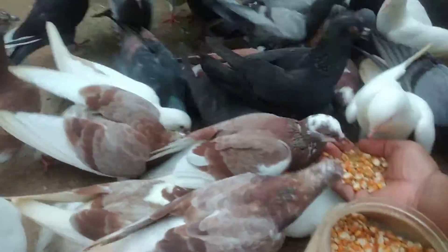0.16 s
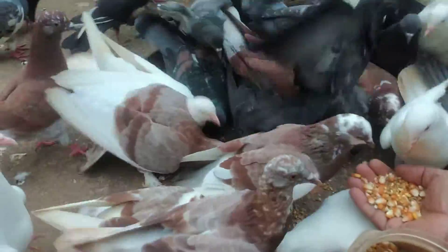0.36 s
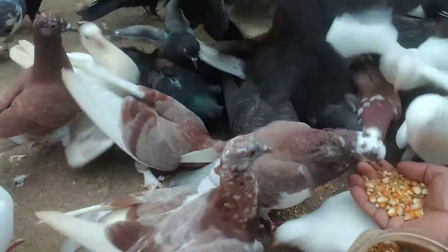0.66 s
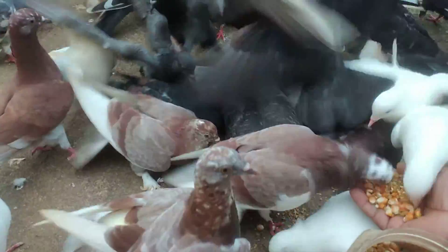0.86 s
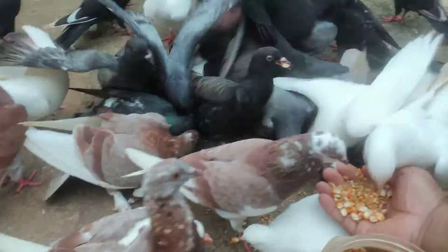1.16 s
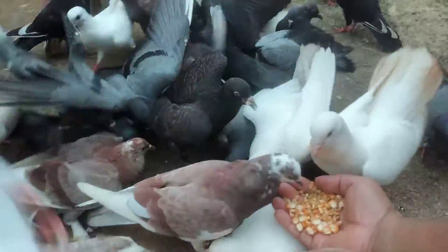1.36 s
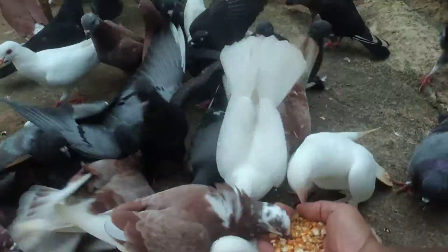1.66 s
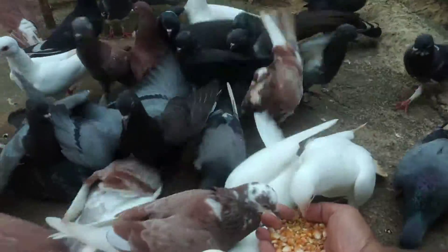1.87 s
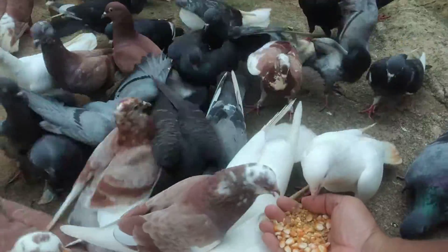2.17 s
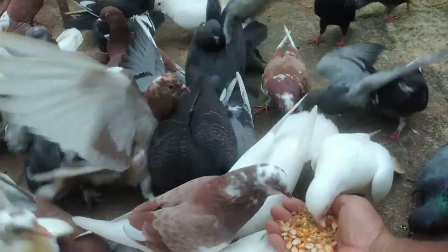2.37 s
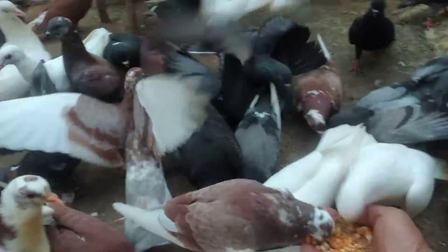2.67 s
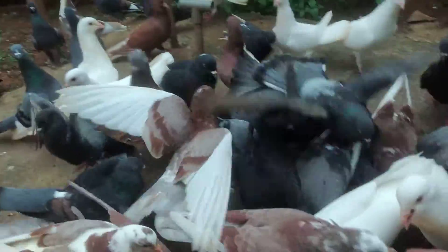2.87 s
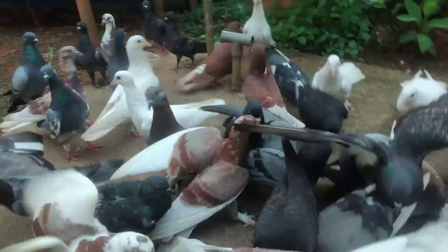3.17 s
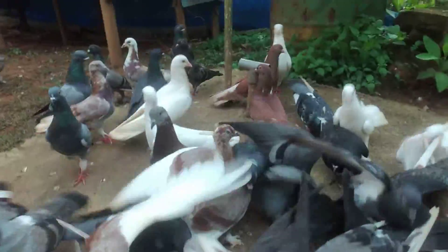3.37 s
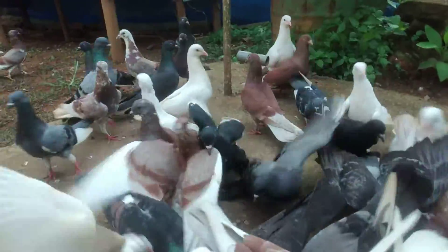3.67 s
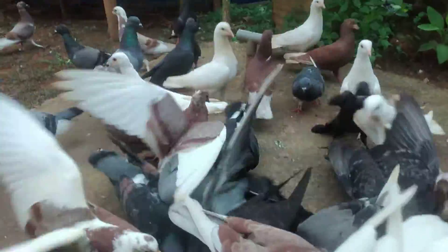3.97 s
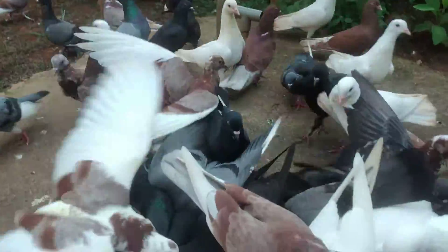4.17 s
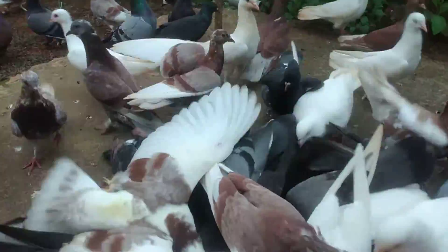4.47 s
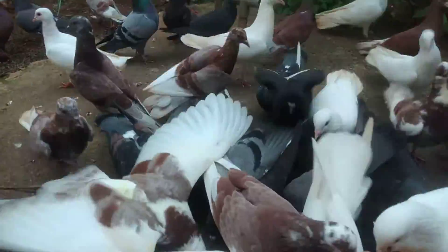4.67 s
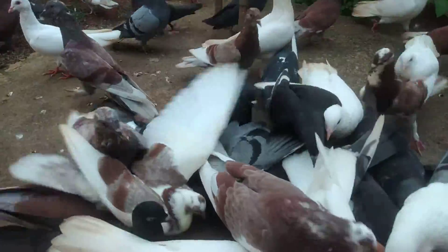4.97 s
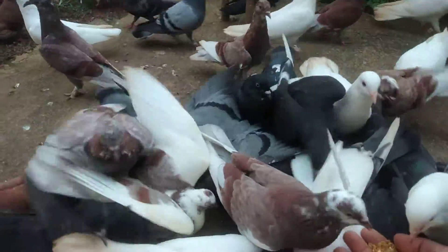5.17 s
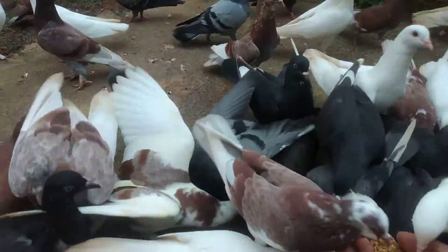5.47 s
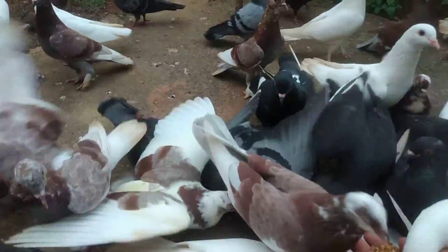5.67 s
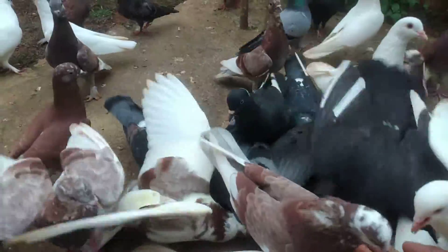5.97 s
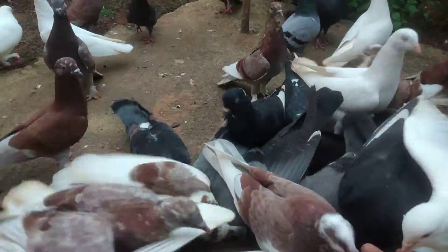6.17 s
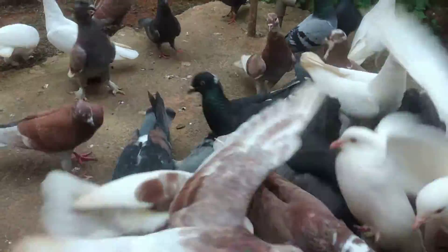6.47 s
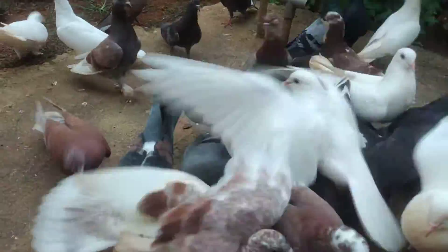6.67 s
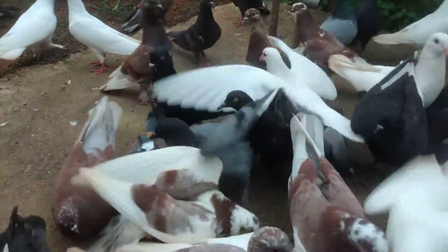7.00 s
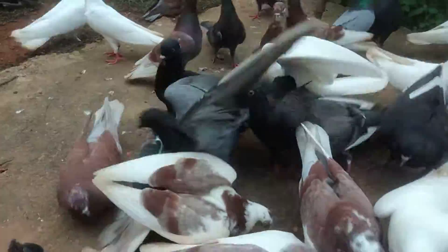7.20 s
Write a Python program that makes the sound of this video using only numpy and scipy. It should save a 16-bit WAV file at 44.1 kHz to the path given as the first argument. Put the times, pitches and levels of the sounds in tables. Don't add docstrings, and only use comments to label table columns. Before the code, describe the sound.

Pigeons scramble for grain around a handheld phone outdoors. Dry, papery wing beats and sharp quill clicks stand out over continuous feather rustle and distant murmuring. Two short bubbling coos drop in pitch, and small raspy chirps stay faint. A deep air thump hits early on; later come light beak ticks, dull handling pops and a final dense clatter of wings. The left is open and bright, the right dull and windy.

```python
import sys
import numpy as np
from scipy import signal
from scipy.io import wavfile

SR = 44100
rng = np.random.default_rng(int(sys.argv[2]) if len(sys.argv) > 2 else 0)


def elevation(decibels):
    levels = np.asarray(decibels, float)
    return 10 ** (levels / 20)


def dump_mix(stems):
    frames = np.atleast_2d(stems).T
    limited = np.clip(frames, -1, 1)
    pcm = np.round(limited * 32767).astype(np.int16)
    wavfile.write(sys.argv[1], SR, pcm)


N = 323694
SHORT = 6615


def rms_one(x):
    return x / np.sqrt(np.mean(x ** 2) + 1e-20)


def in_time(rows, outside=None):
    s, *columns = np.transpose(rows)
    return [np.interp(np.arange(N) / SR, s, column, outside, outside) for column in columns]


def band(x, low_hz, high_hz, order=2):
    return signal.sosfilt(signal.butter(order, [low_hz, high_hz], "band", fs=SR, output="sos"), x)


def resonate(x, hz, width_hz):
    r = np.exp(-np.pi * width_hz / SR)
    return signal.lfilter([(1 - r * r) / 2, 0, (r * r - 1) / 2], [1, -2 * r * np.cos(2 * np.pi * hz / SR), r * r], x)


def drift(rate_hz, size=N):
    r = np.exp(-2 * np.pi * rate_hz / SR)
    settling = 9000
    noise = rng.standard_normal(size + settling)
    return rms_one(signal.lfilter([1], [1, -2 * r, r * r], noise)[settling:])


def add(out, s, sound):
    at = int(s * SR)
    out[at:at + len(sound)] += sound[:N - at]


def dying(t60, rise_s):
    t = np.arange(SHORT) / SR
    return np.minimum(t / rise_s, 1) * elevation(-60 * t / max(t60, .004))


def shaped(noise, envelope):
    return rms_one(noise * envelope) * np.sqrt(np.mean(envelope ** 2))


def bump(centre_s, width_ms):
    return np.exp(-((np.arange(N) / SR - centre_s) * 1000 / width_ms) ** 2)


def patchy_noise(edges, levels_db, patchy_db):
    white, together, out = rng.standard_normal((2, N)), drift(23), 0
    for k, db in enumerate(levels_db):
        swell_db = patchy_db * (1.06 * together + drift(8.5))
        out = out + elevation(db + swell_db) * band(white[k % 2], edges[k], edges[k + 1])
    return rms_one(out)


def beat_swell(column, floor_db):
    # time in seconds, feather swish in dB, flutter of air in dB.
    beat_rows = [(.41, -45, -44), (.52, -39.5, -49.5), (.71, -42, -64), (1.12, -57, -46),
                 (1.35, -42.5, -45), (1.47, -57, -36), (1.76, -50, -53), (2.76, -53.5, -50),
                 (2.815, -49, -50), (2.9, -67, -50), (4.02, -71, -66), (5.68, -55.5, -50), (6.62, -39, -47),
                 (6.71, -47, -46), (7.11, -77, -48)]
    rise_s, fall_s = 0.038, 0.053
    t, power = np.arange(N) / SR, elevation(2 * floor_db) + np.zeros(N)
    for beat in beat_rows:
        late = t - beat[0]
        power = power + elevation(2 * beat[column]) * np.exp(-(late / np.where(late < 0, rise_s, fall_s)) ** 2)
    return 10 * np.log10(power)


def yard_echo(x):
    tail = rng.standard_normal(SHORT) * dying(.3, .02)
    return signal.fftconvolve(band(x, 190, 9300), tail / np.sqrt(np.sum(tail ** 2)))[:N]


def far_cooing():
    murmur = resonate(resonate(rng.standard_normal(N), 252, 70), 252, 70)
    return elevation(-61) * rms_one(murmur) * elevation(1.5 * drift(6))


def whistles():
    # start in seconds, length in seconds, pitch in Hz, level in dB.
    whistle_rows = [
        (3.0, .4, 1060, -63),
        (1.87, .03, 1230, -58),
        (4.68, .09, 1190, -60),
        (1.72, .05, 1190, -61),
        (7.185, .05, 2350, -63),
    ]
    out = np.zeros(N)
    for s, length, hz, db in whistle_rows:
        u = np.arange(int(length * SR)) / (length * SR)
        wavering_hz = hz + 14 * drift(60, size=len(u))
        level = elevation(db + 1.5 * drift(30, size=len(u)))
        add(out, s, level * np.sin(2 * np.pi * np.cumsum(wavering_hz) / SR) * np.sin(np.pi * u))
    return out


def chirps():
    # start in seconds,
    # length in seconds, pitch in Hz, level in dB, trill in dB.
    chirp_rows = [(0.331, 0.081, 2870, -63, -2.5), (0.912, 0.12, 2950, -64, -10),
                  (1.041, 0.104, 2900, -63.5, -0.5), (1.537, 0.097, 2550, -62, -8),
                  (1.654, 0.065, 2520, -64.5, -1), (1.69, 0.074, 2900, -63.5, -3),
                  (2.216, 0.13, 3170, -64, -2), (2.745, 0.1, 2950, -63, -3), (2.78, .075, 3500, -64, -14),
                  (2.974, 0.11, 3268, -66, 0), (3.13, 0.14, 3290, -71, -12), (3.975, 0.13, 2740, -64, -8),
                  (4.11, 0.085, 2980, -65, -3), (4.671, 0.0091, 2550, -66, -8),
                  (4.68, 0.011, 2530, -66, -8), (4.825, 0.15, 3120, -64, -10), (4.94, 0.07, 2430, -66, -6),
                  (4.96, .09, 3040, -69, -12), (5.06, .12, 2860, -65, -1), (5.65, 0.125, 2340, -61, -20),
                  (6.715, .06, 3330, -66, -20), (5.765, .07, 2070, -63, -18), (5.79, 0.1, 2800, -69, -4)]
    out = np.zeros(N)
    for s, length, hz, db, trill_db in chirp_rows:
        trill_hz = 0.34 * hz
        u = np.arange(int(length * SR)) / (length * SR)
        arch = 1 - .05 * np.exp(-u / .2) + .025 * np.sin(np.pi * u) - .05 * u + .004 * drift(20, size=len(u))
        first_db = np.clip((hz - 3100) / 50, -8, 0) - 9
        third_db = -14 + 8.0 * (3000 - hz) / 1000
        partials = [(hz, first_db), (2 * hz, 0), (3 * hz, third_db),
                    (2 * hz - trill_hz, trill_db), (2 * hz + trill_hz, trill_db - 15.0),
                    (2 * hz - 2 * trill_hz, trill_db - 8.0)]
        for partial_hz, share_db in partials:
            shaky_hz = partial_hz * arch + .03 * partial_hz * drift(520, size=len(u))
            rasp = elevation(3.2 * drift(140, size=len(u)))
            voice = rasp * np.sin(2 * np.pi * np.cumsum(shaky_hz) / SR)
            add(out, s, elevation(db + share_db + 9.0) * voice * np.sin(np.pi * u ** .65) ** .75)
        breath = band(rng.standard_normal(len(u)), 1.45 * hz, 2.3 * hz)
        breath_level = elevation(db + 15 + 3 * drift(250, size=len(u)))
        add(out, s, breath_level * breath * np.sin(np.pi * u ** .8))
    return out


def coos():
    # time in seconds, pitch in Hz, first partial in dB, second partial in dB.
    coo_tables = [
        [(0.91, 334, -54, -70), (0.94, 327, -56, -72), (0.965, 299, -53, -69), (1.08, 290.5, -54, -69),
         (1.19, 277, -57, -62), (1.215, 251, -52, -52), (1.24, 245, -66, -60)],
        [(2.18, 302, -48, -55), (2.22, 280, -54, -53), (2.266, 260, -53, -45.5), (2.335, 250, -56.5, -47),
         (2.375, 244.6, -56, -57), (2.39, 230, -70, -62), (2.47, 216, -68, -64)],
    ]
    out = np.zeros(N)
    for rows in coo_tables:
        phase = 2 * np.pi * np.cumsum(in_time(rows)[0] * (1 + 0.01 * drift(50))) / SR
        first_db, second_db = in_time(rows, outside=-120)[1:]
        voice = elevation(first_db + 12.0) * np.sin(phase) + elevation(second_db + 7) * np.sin(2 * phase)
        start, end = rows[0][0], rows[-1][0]
        edge = np.interp(np.arange(N) / SR, [start, start + .04, end - .04, end], [0, 1, 1, 0])
        voice = voice * (1 + .35 * drift(140))
        out += band(voice * edge * elevation(1.5 * drift(25)), 150, 800)
    return out


def gurgles():
    # start in seconds, peak in dB, crop pitch in Hz.
    gurgle_rows = [(.718, -40, 418), (0.792, -46.5, 354), (0.89, -49.5, 328), (1.815, -54.5, 290),
                   (1.869, -52, 320), (1.885, -55.5, 515), (1.955, -41.5, 386), (1.976, -49, 410),
                   (2.049, -43.5, 372), (2.072, -51.5, 386), (2.149, -50, 323), (2.178, -54, 310),
                   (2.15, -57, 510), (2.185, -58, 400), (2.405, -59, 390), (2.44, -60, 385),
                   (2.485, -60, 400), (5.769, -56.5, 290)]
    out, t = np.zeros(N), np.arange(SHORT) / SR
    fall = 1 + 0.18 * np.exp(-t / 0.0056)
    for s, db, hz in gurgle_rows:
        ring = np.sin(2 * np.pi * hz * np.cumsum(fall) / SR)
        add(out, s, elevation(db + 19.5) * ring * dying(0.045, 0.0037))
    return out


def rustle():
    # time in seconds, feather level in dB.
    bustle_rows = [(0.0, -52), (0.35, -52), (0.59, -48), (1.12, -50), (1.33, -50.5), (1.49, -44),
                   (1.8, -49.5), (2.6, -52), (2.82, -51.5), (3.43, -53.5), (4.05, -50), (4.6, -54),
                   (5.72, -51.5), (6.01, -55), (6.34, -52), (6.6, -45), (7.01, -52), (7.34, -54)]
    # frequency in Hz, density in dB per Hz.
    yard_spectrum = [
        (130, -5),
        (186, -4),
        (251, -2),
        (290, -11),
        (446, 0),
        (561, -8.5),
        (648, -7),
        (2600, -17.5),
    ]
    bright_db = beat_swell(column=1, floor_db=in_time(bustle_rows)[0])
    dull_db = -62.5 + 0.74 * (bright_db - bright_db.mean())
    hiss = patchy_noise(np.geomspace(2600, 17000, 8), [-1, -1, 0.1, 0.1, 0.1, -1, -1], patchy_db=1.1)
    flicks = (rng.random(N) < 150 / SR) * elevation(0.57 * np.minimum(rng.exponential(1, N), 4))
    crackle = signal.lfilter([1], [1, -.97], flicks) * rng.standard_normal(N)
    crackle = rms_one(band(crackle, 3000, 15000))
    edges = np.geomspace(130, 2600, 14)
    hz, db = np.transpose(yard_spectrum)
    scuffle = patchy_noise(edges, np.interp(np.log(edges[:-1] * 1.17), np.log(hz), db), patchy_db=1.58)
    return elevation(bright_db - 6.5) * (hiss + elevation(-12) * crackle) + elevation(dull_db + 6.5) * scuffle


def pecks():
    # time in seconds, peak in dB, pitch in Hz.
    peck_rows = [(.524, -44, 740), (0.591, -40, 1790), (0.6255, -30, 1130), (.507, -33, 1300),
                 (6.641, -31, 880), (6.601, -31, 1070), (6.315, -50, 1600), (6.353, -50, 800),
                 (6.748, -46, 1600), (3.428, -53, 3400), (.415, -44, 1300), (.025, -50, 1200),
                 (.253, -50, 1100), (0.9377, -40, 1330), (.938, -48, 4500), (.995, -52, 3000),
                 (1.385, -48, 700), (1.14, -54, 670), (1.62, -40.5, 840), (1.456, -35, 1850),
                 (1.489, -42, 690), (2.768, -42, 930), (2.815, -41, 900), (2.822, -45, 870),
                 (.993, -49.5, 840), (6.604, -27, 390), (1.915, -45.5, 670), (2.19, -47.5, 520),
                 (2.512, -39, 1200), (2.9, -50, 600), (2.905, -51, 1850), (2.952, -49, 1310),
                 (3.0102, -41.5, 1770), (3.146, -52, 1200), (3.337, -51, 2200), (3.464, -41, 940),
                 (4.4, -60.5, 756), (4.47, -38, 890), (5.569, -45.5, 2400), (5.77, -51, 680),
                 (6.291, -45, 1550), (6.748, -45, 640), (6.69, -47, 490), (6.699, -43, 750),
                 (6.725, -46, 850), (1.365, -46, 1100), (1.468, -36, 950), (6.809, -46, 760),
                 (6.932, -53, 1000), (6.1, -53, 1300), (4.986, -51, 4540), (6.98, -55, 2600),
                 (6.992, -55, 2700), (6.985, -53, 4000), (7.03, -57, 2500), (.512, -34.5, 730),
                 (0.63, -33, 730), (2.514, -47, 420), (2.613, -54, 1100), (3.014, -44, 2900),
                 (3.465, -46, 420)]
    out = np.zeros(N)
    for s, db, hz in peck_rows:
        grit = rng.standard_normal(SHORT) * dying(0.025, .0016)
        strike = (np.arange(SHORT) == 40) + .22 * grit
        knock = band(resonate(strike, hz, .3 * hz), .45 * hz, 2.1 * hz)
        add(out, s - .001, elevation(db + 8) * knock / np.abs(knock).max())
    return out


def ticks():
    # time in seconds, peak in dB.
    tick_rows = [(0.0044, -31), (2.0746, -34), (2.873, -31), (3.1094, -42), (3.4787, -31), (4.1794, -30.5),
                 (4.963, -35), (5.1014, -33), (5.1855, -27), (5.9787, -29), (6.2632, -33), (6.494, -25),
                 (6.811, -25.5), (6.929, -37), (7.33, -30)]
    out = np.zeros(N)
    for s, db in tick_rows:
        noise = band(rng.standard_normal(SHORT), 2000, 14000)
        add(out, s - .001, elevation(db - 18.0) * noise * dying(0.03, 0.00091))
    return out


def snaps():
    # time in seconds, peak in dB.
    snap_rows = [(0.2526, -39), (.3342, -32), (0.4036, -17), (0.483, -18.5), (.5070, -17), (.5921, -24),
                 (.5976, -19.5), (0.6252, -11), (0.6704, -31), (0.7085, -16), (0.8592, -28), (0.9016, -24),
                 (.9109, -31), (0.938, -21), (0.9935, -30), (1.348, -17), (1.4222, -23), (1.4247, -33),
                 (1.4464, -9), (1.471, -12.5), (2.237, -38), (2.513, -39), (2.5157, -35), (2.8732, -31),
                 (2.9043, -32), (2.952, -32), (2.9623, -30.5), (3.01, -15), (3.0148, -19.5), (3.0283, -24),
                 (3.355, -31), (3.4127, -33), (3.4265, -38), (3.607, -31), (3.694, -29), (3.7137, -32),
                 (3.9705, -37), (3.9765, -34), (4.0075, -28), (4.0171, -22.5), (4.3898, -31.5),
                 (4.986, -28), (5.437, -41), (6.1032, -32), (6.2175, -31), (6.7845, -30), (6.4412, -35),
                 (6.588, -19), (6.5928, -10.5), (6.5988, -8.5), (6.6022, -11), (6.605, -17), (6.613, -28),
                 (6.6419, -16), (6.6724, -27), (6.81, -30), (6.8856, -34), (6.9286, -38), (7.193, -33),
                 (7.3325, -32)]
    out = np.zeros(N)
    for s, db in snap_rows:
        fizz = rng.standard_normal(SHORT) * dying(0.0076, .0001)
        click = (np.arange(SHORT) == 0) + 0.32 * fizz
        add(out, s, elevation(db - 1.5) * band(click, 2100, 11400, order=1))
    return out


def slaps():
    # time in seconds, bright peak in dB, dull part in dB, t60 in seconds.
    slap_rows = [(.4036, -17, -52, 0.046), (.4836, -10, -63, 0.012), (.5069, -9, -32, 0.019),
                 (.591, -17, -46, 0.015), (.598, -24, -70, 0.02), (.6249, -9, -34, 0.044),
                 (.709, -14, -39, 0.031), (.8592, -25.5, -50, 0.048), (.9383, -22, -46, 0.011),
                 (.9923, -29, -52, 0.023), (1.3085, -27, -46, 0.017), (1.3463, -17, -40, 0.063),
                 (1.366, -16, -37, 0.038), (1.4212, -23.5, -46.5, 0.1), (1.4461, -12, -33.5, 0.072),
                 (1.4706, -14, -34.5, 0.022), (1.49, -28, -46, 0.0091), (2.6817, -34, -55, 0.062),
                 (2.7641, -24, -45.5, 0.027), (2.9612, -32, -51, 0.02), (3.0103, -22, -67, 0.023),
                 (3.3543, -39, -53, 0.019), (4.9853, -32, -57, 0.04), (6.554, -27, -54, 0.018),
                 (6.582, -15, -39, 0.041), (6.588, -11, -41, .02), (6.5942, -11, -32, 0.018),
                 (6.599, -12, -33, 0.022), (6.603, -8, -29, 0.015), (6.637, -31, -41, 0.024),
                 (6.6415, -18, -32, 0.016), (6.6712, -22, -52.5, 0.14), (6.7215, -23, -48.5, 0.034),
                 (6.785, -29, -52, 0.059)]
    # time in seconds, bright peak in dB.
    brush_rows = [(0.253, -31), (0.3325, -42), (.353, -46), (0.8992, -27), (1.518, -28), (1.5414, -38),
                  (2.816, -24), (2.806, -30), (2.826, -28), (3.414, -33.5), (3.6066, -27), (3.693, -29),
                  (4.007, -38), (4.016, -30), (4.385, -35.5), (5.4363, -32), (5.5662, -31), (6.102, -35.5),
                  (6.2181, -39), (6.364, -32), (6.4412, -30), (6.482, -31), (6.8844, -36), (7.194, -40),
                  (1.62, -30), (2.047, -36), (5.806, -36), (5.62, -38)]
    body_hz = 660
    contacts = list(slap_rows) + [(s, db, db - 30, 0.036) for s, db in brush_rows]
    out = np.zeros(N)
    for s, bright_db, dull_db, t60 in contacts:
        crack, puff, push = rng.standard_normal((3, SHORT))
        body = shaped(resonate(resonate(puff, body_hz, 400), body_hz, 4350), dying(1.64 * t60, 0.0026))
        low = elevation(-1.0) * shaped(band(push, 130, 443), dying(1.73 * t60, 0.0044))
        decay = .85 * dying(.8 * t60, .0006) + .15 * dying(3 * t60, .003)
        shiver = elevation(2.5 * drift(120, size=SHORT))
        burst = band(crack, 2400, 16400) * decay * shiver
        add(out, s - .001, elevation(bright_db - 15.5) * burst + elevation(dull_db + 5.5) * (body + low))
    return out


def knocks():
    # time in seconds, peak in dB, t60 in seconds.
    knock_rows = [
        (.003, -35.5, 0.017),
        (0.415, -37, 0.01),
        (1.345, -56, 0.036),
        (2.845, -38, 0.013),
        (2.898, -41.5, 0.013),
        (4.309, -51, 0.018),
        (4.87, -59, 0.034),
        (7.089, -51, .015),
    ]
    out = np.zeros(N)
    for s, db, t60 in knock_rows:
        noise = rng.standard_normal(SHORT)
        edge = elevation(1.45 * (db + 51.0) - 32.5) * band(noise, 280, 1500, order=1)
        add(out, s, elevation(db + 25.0) * (band(noise, 60, 475) + edge) * dying(t60, 0.00054))
    return out


def pops():
    # time in seconds, peak in dB.
    pop_rows = [(.034, -38), (.052, -38), (.215, -40), (.281, -40), (.304, -38), (.321, -37), (.333, -40),
                (.35, -37), (.39, -33), (.416, -30.5), (.434, -35), (.956, -41), (2.748, -41), (2.782, -36),
                (2.826, -32), (2.86, -30), (2.9, -29), (2.926, -32), (2.949, -36), (2.983, -43),
                (3.008, -46), (3.233, -33), (3.253, -40), (3.325, -40), (3.344, -36), (3.357, -38),
                (3.391, -41), (3.409, -39), (3.496, -32), (3.512, -40), (3.53, -40), (3.848, -41),
                (4.112, -36), (6.957, -35), (7.036, -33), (7.062, -35), (7.074, -37), (7.091, -31),
                (7.119, -32), (7.133, -36), (7.152, -35), (7.163, -45), (7.177, -36)]
    rise_s, fall_s, swing_hz = .0016, .008, 65
    out, t = np.zeros(N), np.arange(2646) / SR - .01
    shape = np.where(t < 0, np.exp(t / rise_s), np.cos(2 * np.pi * swing_hz * t) * np.exp(-t / fall_s))
    for s, db in pop_rows:
        add(out, s - .01, elevation(db) * band(shape, 15, 700, order=1))
    return out


def wing_blast():
    # time in seconds, eddy noise in dB.
    blast_rows = [
        (1.4, -62),
        (1.45, -36),
        (1.47, -30),
        (1.5, -40),
        (1.552, -55),
        (1.66, -55),
    ]
    # time in seconds, depth in dB, width in ms.
    eddy_rows = [(1.432, -17, 2.8), (1.446, -8.5, 1.24), (1.453, -17, 2.9), (1.4654, -13, 0.6),
                 (1.4707, -10.5, 1.03), (1.477, -16.5, 2.1), (1.482, -13.5, 0.93), (1.49, -12, 0.42),
                 (1.4912, -14, 0.52), (1.4938, -16.5, 0.74), (1.5049, -20, 1.1), (1.52, -25, 3.0),
                 (1.532, -23, 1.2), (1.538, -24, 1)]
    pressure = elevation(-13.5) * bump(1.473, 19)
    pressure += elevation(-16) * bump(1.449, 1.2)
    for s, db, width_ms in eddy_rows:
        pressure -= elevation(db) * bump(s, width_ms)
        pressure += elevation(db - 7) * bump(s + 2.2 * width_ms / 1000, width_ms)
    turbulence = band(band(rng.standard_normal(N), 99, 274, order=1), 53, 630)
    turbulence = rms_one(turbulence) * elevation(5.5 * drift(50))
    return band(pressure, 8, 4000, order=1) + elevation(in_time(blast_rows, outside=-120)[0] + 3.0) * turbulence


def thumps():
    # time in seconds, left in dB, right in dB, swing in Hz, t60 in seconds.
    thump_rows = [
        (1.339, -13.5, -12, 28.8, 0.14),
        (1.351, -23, -26, 74, 0.072),
    ]
    out, t = np.zeros((2, N)), np.arange(SHORT) / SR
    for s, left_db, right_db, hz, t60 in thump_rows:
        swing = np.sin(2 * np.pi * hz * t) * dying(t60, 0.71 / hz)
        add(out[0], s, elevation(left_db + 9.0) * swing)
        add(out[1], s - .003, elevation(right_db + 6.5) * swing)
    return out


def wind():
    # time in seconds, gust in dB, left minus right in dB.
    gust_rows = [(0, -32, -25), (.14, -38, -5), (.41, -35, -15), (.47, -40, 3), (.72, -34, 8),
                 (1.04, -43.5, -4), (1.18, -34.5, 5), (1.28, -49, 3), (1.47, -31, 14), (1.6, -38, 7),
                 (2.2, -46.5, -1), (2.82, -35.5, -7.5), (3.4, -37, -6), (4.5, -45, -0.5), (6.5, -46, -1.5),
                 (6.7, -41, 0), (7.1, -43, -10), (7.34, -44.5, -9)]
    gust_db, pan_db = in_time(gust_rows)
    flutter_db = beat_swell(column=2, floor_db=-49.5)
    right_db = -10 * np.log10((1 + elevation(2 * pan_db)) / 4)
    left_db = right_db + pan_db
    shared, *gusts = [rms_one(band(rng.standard_normal(N), 10, 40)) for part in range(3)]
    flutter = [rms_one(band(rng.standard_normal(N), 76, 116, order=3)) * elevation(2.5 * drift(12)) for port in range(2)]
    lumpy_db = gust_db - 9.0 + 2.37 * drift(6.0)
    out = elevation(lumpy_db + np.array([left_db, right_db])) * (np.array(gusts) + 0.47 * shared)
    out[0] += elevation(flutter_db - 0.5) * flutter[0] + wing_blast()
    puffs = rms_one(band(rng.standard_normal(N), 78, 118, order=1)) * elevation(4.0 * drift(23))
    out[1] += elevation(.5 * (gust_db + right_db) - 43) * flutter[1]
    out[1] += elevation(gust_db + right_db - 42) * band(puffs, 40, 1700)
    return out + thumps()


def scene():
    voices = whistles() + chirps() + coos() + gurgles()
    yard = far_cooing() + voices + rustle() + pecks() + ticks() + snaps() + slaps()
    yard = yard + elevation(-10) * yard_echo(voices)
    muffled = elevation(-25) * band(yard, 100, 550)
    return np.array([yard, muffled + knocks() + pops()]) + wind()


def low_pass(x):
    return signal.sosfilt(signal.butter(12, 16660, fs=SR, output="sos"), x)


def record(dry):
    port_hz, port_width_hz, port_db = 7428, 760, 20
    left = dry[0] + elevation(port_db) * resonate(dry[0], port_hz, port_width_hz)
    x = np.array([left, dry[1]]) + elevation(-75.5) * rng.standard_normal(dry.shape)
    x = signal.sosfilt(signal.cheby2(10, 60, 16800, fs=SR, output="sos"), x)
    return low_pass(x)


dry = scene()
out = record(dry)
dump_mix(out)
```